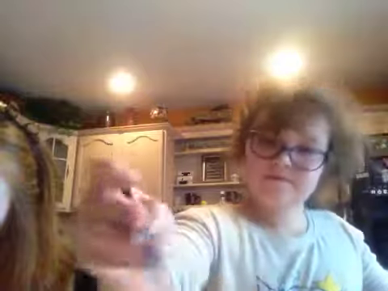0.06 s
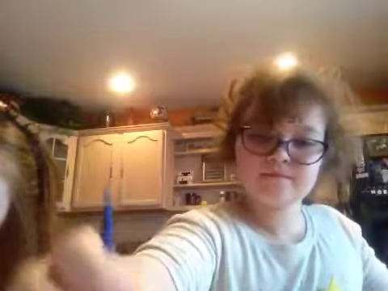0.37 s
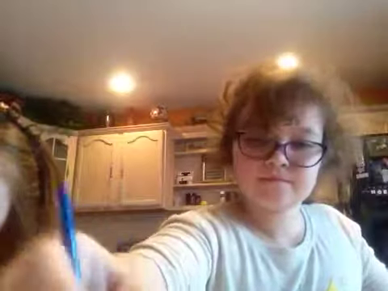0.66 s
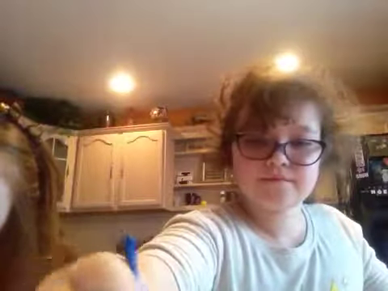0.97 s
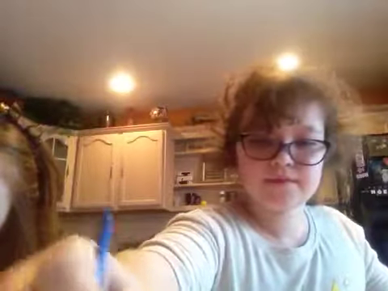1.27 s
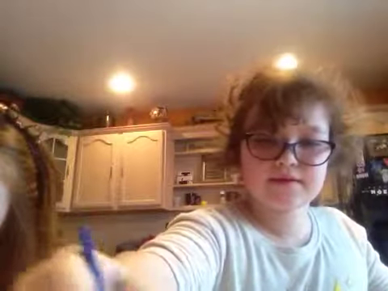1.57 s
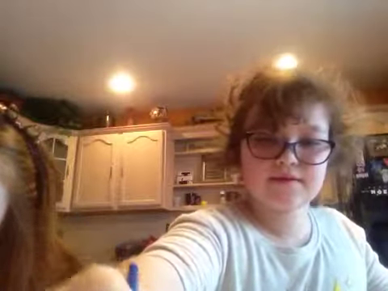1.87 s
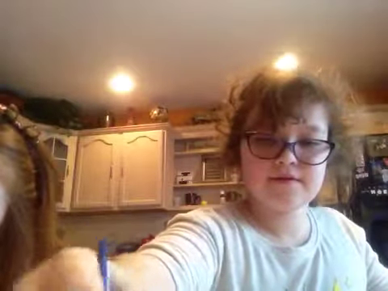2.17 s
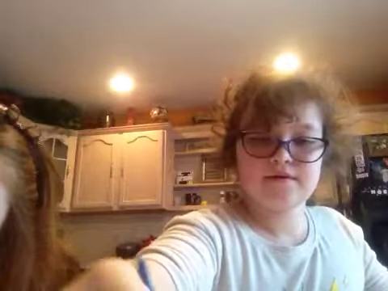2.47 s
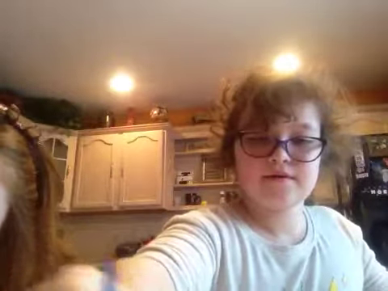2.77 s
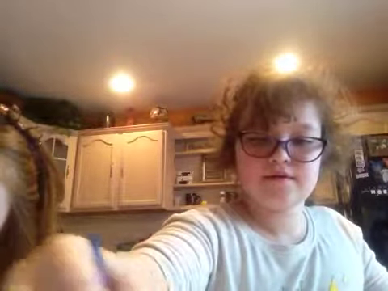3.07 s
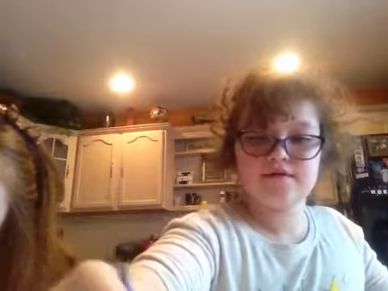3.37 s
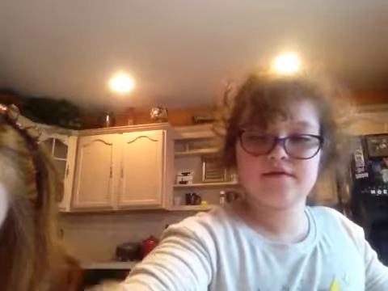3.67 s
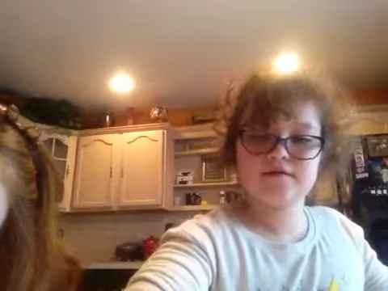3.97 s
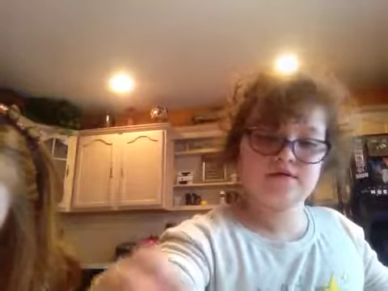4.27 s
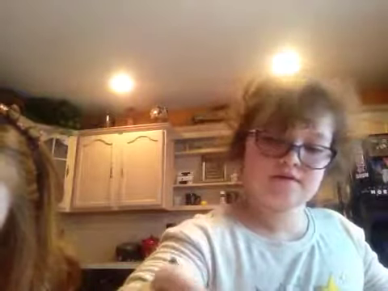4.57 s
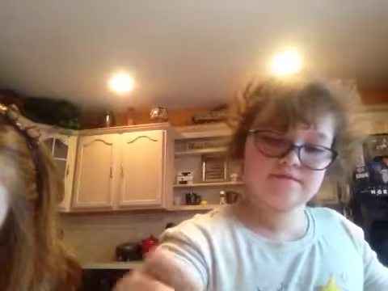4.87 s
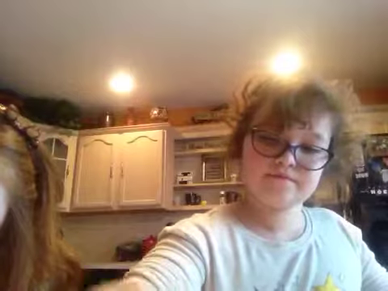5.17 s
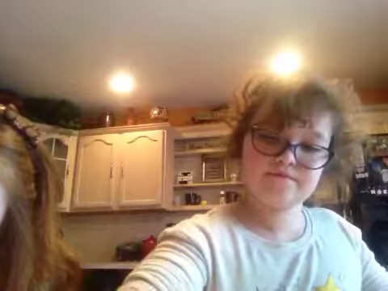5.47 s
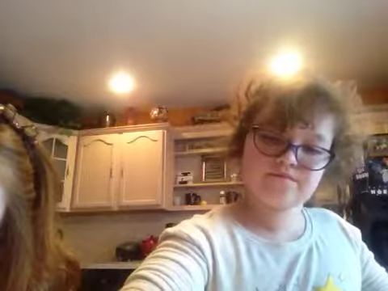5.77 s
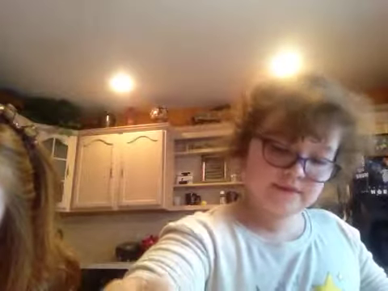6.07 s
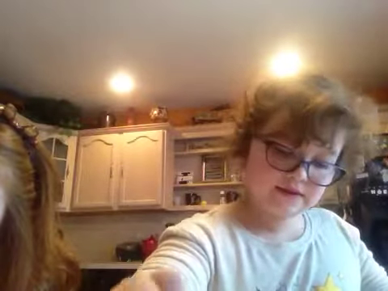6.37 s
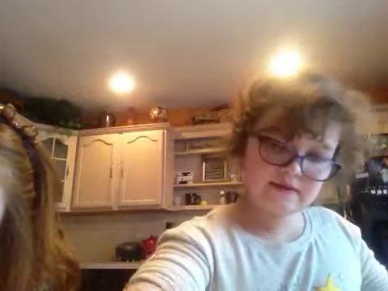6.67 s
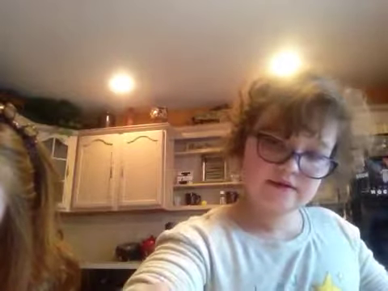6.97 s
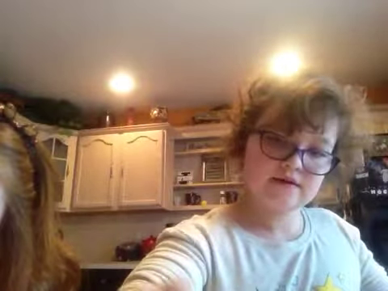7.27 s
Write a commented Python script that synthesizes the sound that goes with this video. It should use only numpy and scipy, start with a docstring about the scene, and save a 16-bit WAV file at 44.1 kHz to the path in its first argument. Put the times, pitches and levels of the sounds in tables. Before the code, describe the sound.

Fingers fiddle with a plastic pen, making faint rubs, ticks and tiny squeaks. About halfway through, the pen taps a table three times and a hand comes down with dull thuds. After a short pause the tapping resumes in a steady run, each tap a hard click with a woody knock, ending in a quick bounce. The microphone stands on the table in a slightly echoing kitchen with low hum and hiss.

```python
"""Faint rubbing, ticks and squeaks come first: fingers fiddle with a plastic pen, exciting it by friction.
Then the pen taps the kitchen table on which the microphone stands. Each impact gives a hard click from
the pen's modes, followed by a knock from bending waves in the table top. Once the hand comes down with
dull thuds, and at the end the pen bounces. The kitchen reverberates briefly over a low hum and hiss."""
import sys
import numpy as np
from scipy import signal
from scipy.fft import rfft, irfft
from scipy.io import wavfile

SR = 44100
rng = np.random.default_rng(int(sys.argv[2]) if len(sys.argv) > 2 else 0)


def dump_mix(stems):
    """Bounce the given channels to the path in sys.argv[1] as a 16-bit WAV at rate SR."""
    frames = np.atleast_2d(stems).T  # one column per channel
    limited = np.clip(frames, -1, 1)  # hard clip at full scale
    pcm = np.round(limited * 32767).astype(np.int16)
    wavfile.write(sys.argv[1], SR, pcm)


N = 327222

# Impacts of the pen, bounces included. Each row: start in seconds, strength in dB, hand's weight in dB.
PEN_TAPS = [(3.7191, -11.5, -4.5), (3.9058, -12, 0.5), (4.0631, -14.5, 2.5), (5.2423, -12.5, -4.5),
            (5.2604, -28.5, 6.5), (5.4427, -14.5, 4), (5.6648, -22.5, 3.5), (5.8502, -15.5, 0.5),
            (6.0834, -15, -3), (6.2548, -17.5, -6), (6.4996, -15, -3), (6.6779, -10.5, -3.5),
            (6.8518, -12.5, -2.5), (7.0556, -12.5, 0.5), (7.1479, -30.5, -14), (7.225, -16, -4.5),
            (7.2417, -30, -5), (7.2984, -24.5, -4.5), (7.3075, -20.5, -16), (7.3169, -25.5, -5)]
# Lean of the pen. Each row: time in seconds, slant from 0 (upright) to 1 (full lean).
PEN_SLANT = [(5.2, 0), (5.7, 0.86), (6.25, 0.7), (7.3, 0.97)]
def tap_levels():
    """Excitation depends on the blow: slant makes a tap hollower, the hand's weight strengthens its knock."""
    starts, strength, weight = np.transpose(PEN_TAPS)
    slant = np.interp(starts, *np.transpose(PEN_SLANT))
    click_db = strength - 1 + slant
    hollow_db = strength - 11 + 10 * slant + 0.21 * weight
    bright_db = strength - 8 - 2 * slant
    knock_db = strength - 2.9 + weight
    return starts, slant, click_db, hollow_db, bright_db, knock_db


# Three registers of the hard contact. Each row: frequency in Hz, level in dB, 60 dB decay time in seconds.
CLICK_MODES = [(2738, 3.5, 0.0095), (3600, -5.5, 0.0039), (2536, -30, 0.15)]
BRIGHT_MODES = [(5160, 4, 0.0076), (4360, 2, 0.0066), (6400, -4.5, 0.002), (7050, -20, 0.0084),
                (9130, -6, 0.0029)]
HOLLOW_MODES = [(1350, 4, 0.0044), (1888, -4.5, 0.0099), (2273, -5.5, 0.015), (1486, -37, 0.49),
                (1780, -56, 0.061)]
def taps(click_lag_s=0.00062, knock_lag_s=0.003927, spread_db=2.9):
    """Impact excitation: the pen's click arrives first, the table's slower bending wave after it."""
    starts, slant, click_db, hollow_db, bright_db, knock_db = tap_levels()
    click = gripped_modes(starts, click_db, np.ones(len(starts)), CLICK_MODES, spread_db)
    bright = gripped_modes(starts, bright_db, 1 + 0.16 * slant, BRIGHT_MODES, spread_db)
    hollow = struck_modes(starts, hollow_db, HOLLOW_MODES, spread_db)
    pen = butter(click, 2040, "high") + butter(bright, 3000, "high") + butter(hollow, 930, "high")
    pen = dispersed(butter(pen, 12000, "low"), hz=3330, width_hz=6000)
    return delayed(pen, click_lag_s) + table_knock(starts + knock_lag_s, knock_db)


def gripped_modes(starts, levels_db, first_mode_ratios, modes, spread_db, detune=0.022):
    """Boundary conditions set pitch: grip and angle retune the pen's damped modes at every tap."""
    hz, mode_db, t60 = np.transpose(modes)
    t = np.arange(int(0.2 * SR)) / SR
    decay = from_db(-60 * t / t60[:, None])
    polarity = (-1.0) ** np.arange(len(hz))
    out = np.zeros(N + SR)
    for start, db, ratio in zip(starts, levels_db, first_mode_ratios):
        pitch_scatter, level_scatter = rng.standard_normal((2, len(hz)))
        tuned_hz = hz * (1 + detune * pitch_scatter)
        tuned_hz[0] *= ratio
        gains = polarity * from_db(db + mode_db + spread_db * level_scatter)
        first = int(start * SR)
        out[first:first + len(t)] += gains @ (decay * np.sin(2 * np.pi * tuned_hz[:, None] * t))
    return out[:N]


def tap_snaps(snap_lag_s=0.0007, crack_lag_s=0.0016):
    """A brief contact has a broad spectrum: it shakes many dense, heavily damped modes at once."""
    starts, _, click_db = tap_levels()[:3]
    snap = impulses(starts + snap_lag_s, click_db + 7)
    crack = bursts(starts + crack_lag_s, click_db - 4, decay_s=0.00111)
    return butter(snap, [1700, 6500], "band") + butter(crack, [2300, 4000], "band")


# Modes of the table top. Each row: frequency in Hz, level in dB, 60 dB decay time in seconds.
TABLE_MODES = [(137, -35, 0.11), (230.2, -28, 0.32), (355, -36.5, 0.36), (354, -60, 0.57),
               (464, -16.5, 0.1), (646, -12.5, 0.081), (671, -32, 0.55), (688, -35, 0.23),
               (757, -30.5, 0.17), (808, -36.5, 0.33), (927, -31, 0.15), (1015, -34.5, 0.13),
               (1183, -24, 0.077)]
def table_knock(starts, db):
    """Plate vibration: a hard blow launches a bending wave and excites the table's modes."""
    return table_top(impulses(starts, db), struck_modes(starts, db, TABLE_MODES, spread_db=3))


def table_top(force, ringing, echo_s=0.00458):
    """Edge reflection: a bending wave passes as one swing and returns weaker, over the ringing modes."""
    swing = from_db(25) * butter(butter(force, 400, "high"), 1150, "low", order=3)
    return swing + from_db(-11) * delayed(swing, echo_s) + butter(ringing, 198, "high", order=4)


def refill_rattle(delay_range_s=(0.016, 0.08), count=8):
    """Secondary impacts: after each tap the loose refill strikes the inside of the barrel."""
    starts, strength = np.transpose(PEN_TAPS)[:2]
    times = starts[:, None] + rng.uniform(*delay_range_s, (len(starts), count))
    db = strength[:, None] - 45 + 2 * rng.standard_normal(times.shape)
    return butter(bursts(times.ravel(), db.ravel(), decay_s=0.0021), [3000, 12000], "band", order=1)


# Blows of the hand. Each row: start in seconds, level in dB, contact cut-off in Hz, relative room send in dB.
HAND_BLOWS = [(4.0145, -18, 795, 9), (4.1712, -17.5, 1140, -4), (4.173, -6.5, 1140, -3),
              (4.2018, -11, 960, 11.5)]
def hand_thuds(room_db=19):
    """A soft contact low-passes the force, so the hand drives the table without treble."""
    blows = np.array([butter(impulses(np.array([start]), db), cutoff_hz, "low", order=4)
                      for start, db, cutoff_hz, _ in HAND_BLOWS])
    force = blows.sum(axis=0)
    ringing = from_db(-2) * ring(force, TABLE_MODES)
    airborne = from_db(np.array(HAND_BLOWS)[:, 3] + room_db) @ blows
    return from_db(2) * table_top(force, ringing) + kitchen(butter(airborne, 250, "high"))


# Skids of the pen on the table. Each row: start in seconds, length in seconds, level in dB.
TIP_SKIDS = [(3.775, 0.035, -55), (3.985, 0.016, -43), (4.163, 0.011, -29.5), (4.169, 0.077, -46.5),
             (5.519, 0.021, -43)]
# Spectrum of a skid. Each row: frequency in Hz, relative level in dB.
SKID_SPECTRUM = [(60, -49), (400, -9), (1200, 5.5), (2200, -7), (3000, -1.5), (5500, -3), (9000, -5.5),
                 (15000, -15)]
def tip_skids(room_db=8):
    """Sliding friction: the tip chatters over the surface in short grainy bursts."""
    scrape = strokes(TIP_SKIDS) * friction_noise(SKID_SPECTRUM, grains_per_s=2000)
    return scrape + from_db(room_db) * kitchen(scrape)


# Ticks of the pen's loose parts. Each row: start in seconds, level in dB.
PEN_TICKS = [(0.592, -47), (0.622, -49), (0.633, -38), (0.6862, -44.5), (0.8438, -42.5), (1.3859, -43),
             (1.435, -48), (1.536, -46), (1.6532, -47), (2.037, -45.5), (2.1182, -42), (2.611, -51.5),
             (3.019, -47.5), (3.077, -46.5), (3.9873, -34.5), (6.353, -43), (6.9227, -43)]
# Finger strokes along the barrel. Each row: start in seconds, length in seconds, level in dB.
FINGER_STROKES = [(.2, 0.39, -76), (.47, 0.16, -71), (.628, 0.05, -56), (.81, 0.12, -64.5),
                  (.98, 0.098, -62.5), (1.18, .12, -65.5), (1.41, 0.16, -65.5), (1.86, 0.22, -64.5),
                  (2.05, 0.28, -70), (2.36, 0.12, -64), (2.81, .09, -67.5), (3.3, 0.076, -65.5)]
# Spectrum of skin rubbing plastic. Each row: frequency in Hz, relative level in dB.
RUB_SPECTRUM = [(880, -57), (1500, -46), (1970, -6), (2890, -1.5), (4100, -7), (6070, -4), (6750, -3),
                (12600, -13), (14100, -20), (15500, -48)]
# Modes of the hand-held barrel. Each row: frequency in Hz, level in dB, 60 dB decay time in seconds.
BARREL_MODES = [(2740, -22, 0.032), (4880, -11, 0.015), (7050, -8, .012)]
def fingers(catches_per_s=14, room_db=4):
    """Friction and small impacts drive the barrel's modes: skin slips and catches, loose parts tick."""
    starts, db = np.transpose(PEN_TICKS)
    pressure = strokes(FINGER_STROKES)
    catches = pressure * from_db(9) * (rng.random(N) < catches_per_s / SR)
    ticks = butter(bursts(starts, db, decay_s=0.003), [1800, 9000], "band", order=1)
    ringing = struck_modes(starts, db, BARREL_MODES, spread_db=3) + ring(catches, BARREL_MODES)
    rub = pressure * friction_noise(RUB_SPECTRUM, grains_per_s=900)
    rub += from_db(-13) * ring(pressure * rng.standard_normal(N), BARREL_MODES)
    return ticks + ringing + catches + rub + from_db(room_db) * kitchen(ticks + ringing)


# Squeaks of skin on plastic. Each row: start in seconds, centre frequency in Hz, level in dB.
SKIN_SQUEAKS = [(1.21, 2600, -67), (1.77, 3200, -60.5), (2.362, 2380, -66.5)]
def skin_squeaks(length_s=0.041, half_width=0.11):
    """Stick-slip motion: a fingertip grips and releases for a moment at one rough pitch."""
    t = np.arange(N) / SR
    white = rng.standard_normal(N)
    out = 0
    for start, hz, db in SKIN_SQUEAKS:
        swell = np.sin(np.pi * np.clip((t - start) / length_s, 0, 1))
        band = butter(white, [hz * (1 - half_width), hz * (1 + half_width)], "band")
        out += from_db(db) * swell * unit_rms(band)
    return out


def tap_reverberation():
    """Radiation varies with frequency: each register of a tap reaches the room with its own strength."""
    starts, slant, click_db, hollow_db, bright_db, knock_db = tap_levels()
    lean_db = slant  # full slant sends 1 dB more into the room
    airborne = butter(impulses(starts, knock_db + lean_db + 27), 907, "low", order=3)
    airborne += butter(impulses(starts, hollow_db + lean_db + 28), [1000, 2300], "band")
    airborne += butter(impulses(starts, click_db + lean_db + 29), [2400, 3900], "band")
    airborne += butter(impulses(starts, bright_db + lean_db + 34), 4070, "high", order=3)
    return kitchen(airborne)


# Colour of the kitchen's reflections. Each row: frequency in Hz, relative level in dB.
ROOM_SPECTRUM = [(60, -31), (130, 6.5), (220, 10), (290, -40), (400, 13.5), (550, 8), (750, 7.5), (1200, 5),
                 (2000, 7.5), (2800, 2.5), (3900, 3.5), (5000, 5), (7000, -4.5), (10000, -18.5),
                 (15000, -22.5)]
# Reverberation of the kitchen. Each row: frequency in Hz, 60 dB decay time in seconds.
ROOM_T60 = [(150, 0.49), (450, 0.49), (800, 0.48), (1500, 0.43), (4000, 0.41), (8000, 0.3), (14000, 0.23)]
def kitchen(x, onset_s=0.0012):
    """A diffuse field builds up quickly, then decays exponentially at its own rate in each band."""
    t = np.arange(int(0.7 * SR)) / SR
    edges_hz = np.geomspace(50, 17000, 19)
    white = rng.standard_normal((2, len(t)))
    tail = 0
    for k, (low, high) in enumerate(zip(edges_hz, edges_hz[1:])):
        hz = np.sqrt(low * high)
        decay = from_db(-60 * t / at_hz(ROOM_T60, hz))
        tail += butter(white[k % 2], [low, high], "band") * decay * from_db(at_hz(ROOM_SPECTRUM, hz))
    build_up = 1 - np.exp(-(t / onset_s) ** 2)
    return signal.fftconvolve(x, tail * build_up)[:N] / np.sqrt(SR)


# Tones of an appliance. Each row: frequency in Hz, level in dB.
HUM_TONES = [(172.5, -75.5), (417, -78)]
# Spectrum of room rumble and microphone hiss. Each row: frequency in Hz, relative level in dB.
FLOOR_SPECTRUM = [(18, -88), (30, -47), (69, -24), (140, -6.5), (173, -2), (197, -4.5), (256, -2),
                  (389, -7.5), (420, -8.5), (591, -7), (2020, -17), (3780, -19.5), (4780, -19),
                  (6370, -19.5), (15500, -25.5)]
def background(waver_db=2, floor_db=-63.5):
    """The noise floor: steady rumble and hiss lie under a hum with slow amplitude modulation."""
    t = np.arange(N) / SR
    hum = sum(np.sqrt(2) * from_db(db + waver_db * drift(5.7)) * np.sin(2 * np.pi * hz * t)
              for hz, db in HUM_TONES)
    return hum + from_db(floor_db) * coloured(rng.standard_normal(N), FLOOR_SPECTRUM)


def struck_modes(starts, db, modes, spread_db):
    """The striking point weights the modes: every blow excites each with a random strength."""
    scatter_db = spread_db * rng.standard_normal((len(starts), len(modes)))
    return sum(ring(impulses(starts, db + scatter_db[:, k]), [mode]) for k, mode in enumerate(modes))


def ring(force, modes):
    """Modal superposition: each mode answers an impulse with a decaying sine."""
    out = 0
    for hz, db, t60 in modes:
        radius, angle = from_db(-60 / (t60 * SR)), 2 * np.pi * hz / SR
        feedback = [1, -2 * radius * np.cos(angle), radius * radius]
        out += from_db(db) * signal.lfilter([0, np.sin(angle)], feedback, force + 1e-18)
    return out


def dispersed(x, hz, width_hz):
    """Dispersion, as in a plate: an all-pass delays some frequencies more than others."""
    radius = np.exp(-np.pi * width_hz / SR)
    feedback = [1, -2 * radius * np.cos(2 * np.pi * hz / SR), radius * radius]
    return signal.lfilter(feedback[::-1], feedback, x)


def friction_noise(spectrum, grains_per_s, grain_db=4):
    """Rapid random amplitude modulation makes noise grainy."""
    return coloured(rng.standard_normal(N) * from_db(grain_db * drift(grains_per_s)), spectrum)


def strokes(rows):
    """Pressure envelope: each stroke rises and falls in a steep-sided arch."""
    out = np.zeros(N)
    for start, length_s, db in rows:
        first, size = int(start * SR), max(int(length_s * SR), 8)
        arch = np.sqrt(np.abs(np.sin(np.linspace(0, np.pi, size))))
        out[first:first + size] += from_db(db) * arch
    return out


def bursts(starts, db, decay_s):
    """Noise transients with instant attack and exponential decay."""
    envelope = signal.lfilter([1], [1, -np.exp(-1 / (decay_s * SR))], impulses(starts, db) + 1e-18)
    return envelope * rng.standard_normal(N)


def impulses(starts, db):
    """Ideal impacts: one impulse per contact."""
    out = np.zeros(N)
    np.add.at(out, np.clip(np.round(starts * SR).astype(int), 0, N - 1), from_db(db))
    return out


def delayed(x, lag_s):
    """Propagation delay."""
    return np.interp(np.arange(N) - lag_s * SR, np.arange(N), x, left=0)


def drift(points_per_s):
    """Random wander of rms 1."""
    return unit_rms(np.interp(np.arange(N) * points_per_s / SR, np.arange(N), rng.standard_normal(N)))


def coloured(x, spectrum):
    """Spectral shaping, scaled to rms 1."""
    hz = np.arange(N // 2 + 1) * SR / N
    return unit_rms(irfft(rfft(x) * from_db(at_hz(spectrum, hz)), N))


def butter(x, hz, kind, order=2):
    """Causal Butterworth filter."""
    return signal.sosfilt(signal.butter(order, hz, kind, fs=SR, output="sos"), x + 1e-18)


def at_hz(points, hz):
    """Interpolation on a log-frequency axis."""
    known_hz, values = np.transpose(points)
    return np.interp(np.log(np.maximum(hz, 1)), np.log(known_hz), values)


def unit_rms(x):
    """Normalisation to rms 1."""
    return x / np.sqrt(np.mean(x ** 2) + 1e-20)


def from_db(db):
    """Decibels to amplitude ratio."""
    return 10 ** (np.asarray(db) / 20)


def scene():
    """Superposition: all sources add at one microphone."""
    tapping = taps() + tap_snaps() + tap_reverberation() + refill_rattle()
    handling = hand_thuds() + tip_skids() + fingers() + skin_squeaks()
    return (tapping + handling + background())[None]


def record(dry, square_law_db=-16, bass_cut_hz=95, treble_cut_hz=15200):
    """Quadratic distortion and band limiting: the small microphone skews peaks and loses both extremes."""
    skewed = dry + from_db(square_law_db) * dry ** 2
    thin = butter(skewed, bass_cut_hz, "high", order=1)
    return signal.sosfilt(signal.ellip(10, 0.1, 70, treble_cut_hz, fs=SR, output="sos"), thin)


dry = scene()
out = record(dry)
dump_mix(out)
```